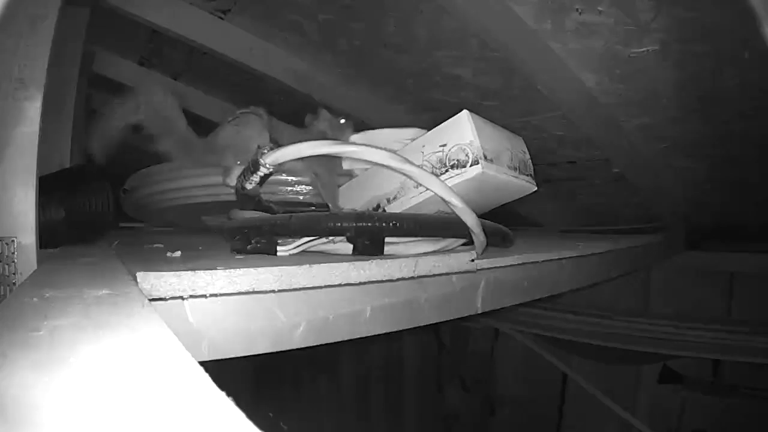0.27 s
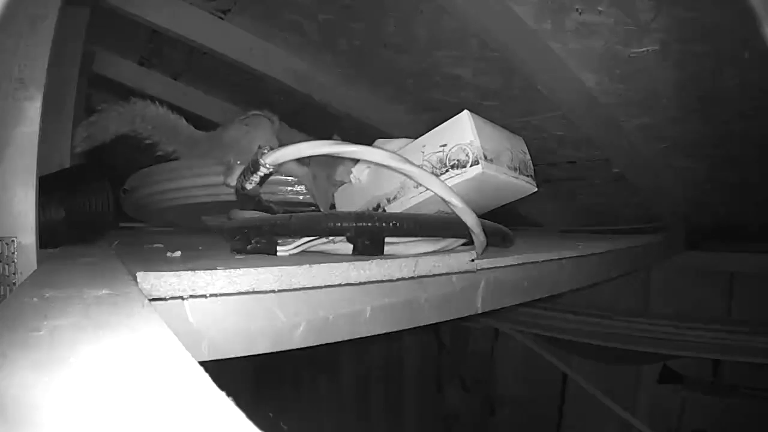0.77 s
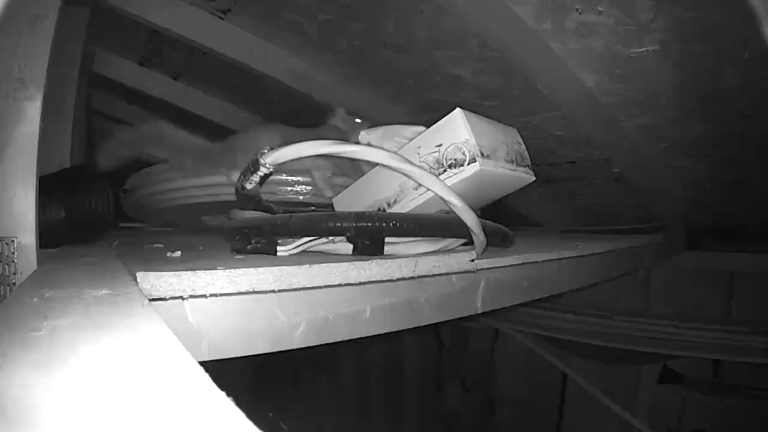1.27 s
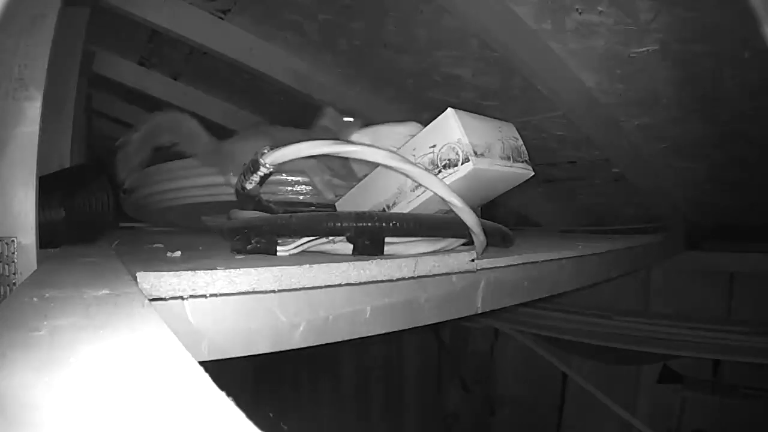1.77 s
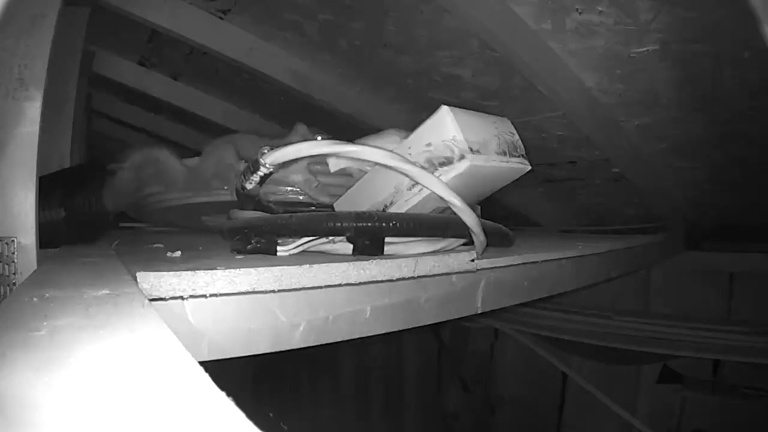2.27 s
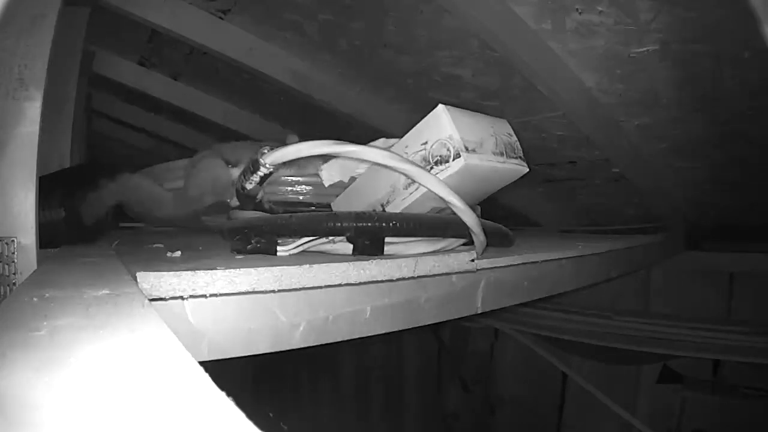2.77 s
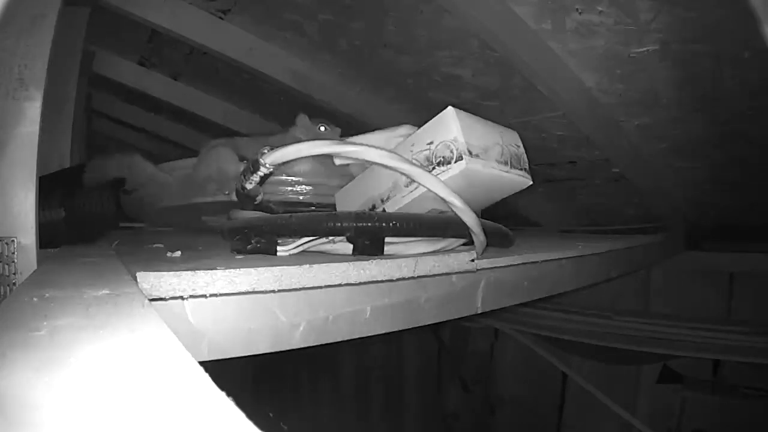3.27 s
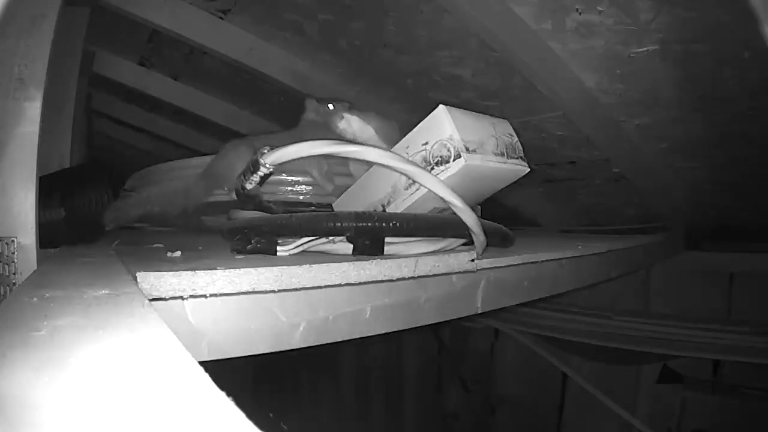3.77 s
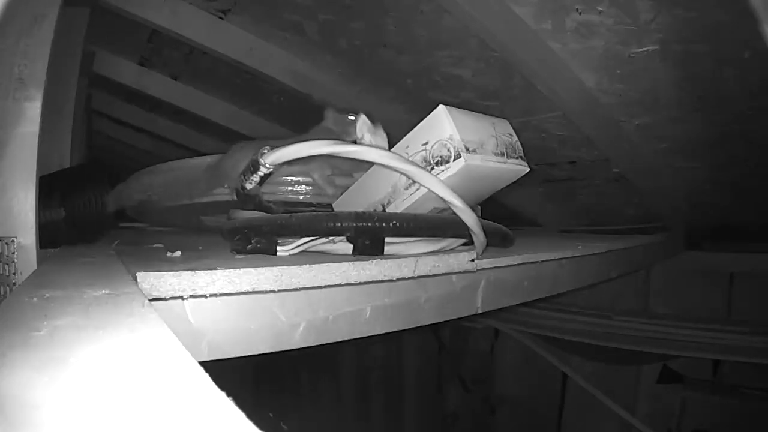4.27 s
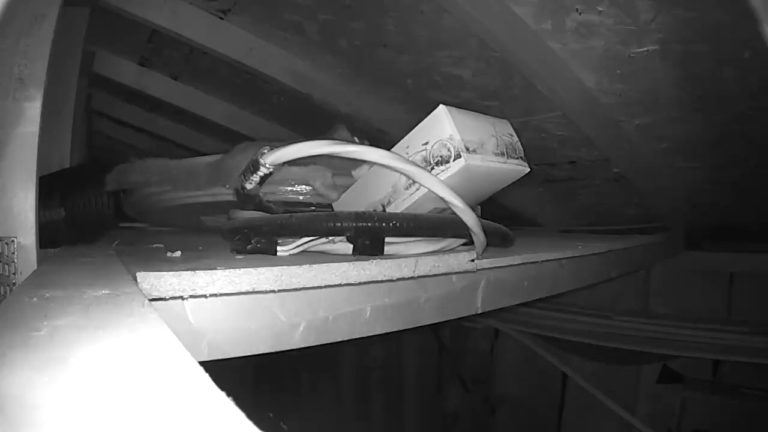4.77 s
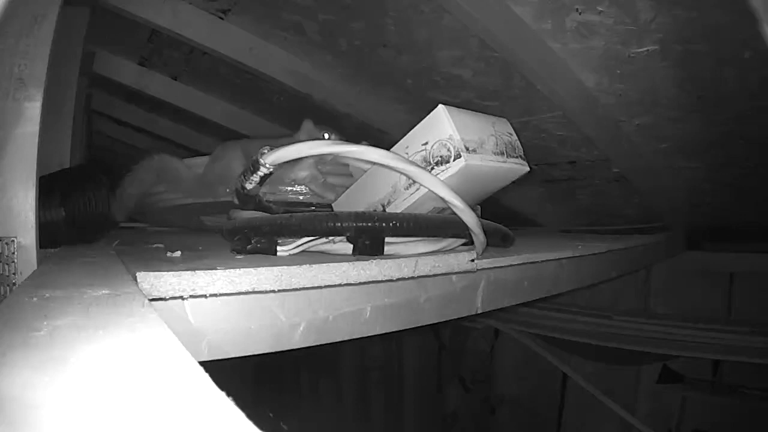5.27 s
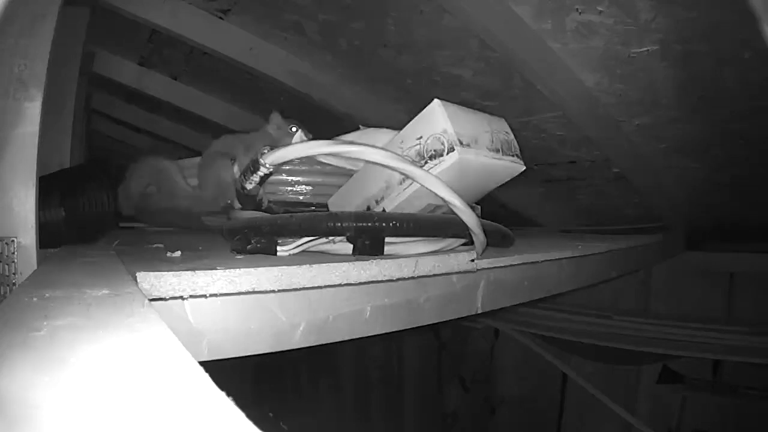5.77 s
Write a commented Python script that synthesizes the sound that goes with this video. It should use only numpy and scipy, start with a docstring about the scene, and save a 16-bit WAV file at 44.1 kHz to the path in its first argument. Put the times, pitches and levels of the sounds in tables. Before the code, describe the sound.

A squirrel works at dry nest material on a wooden attic shelf, close to a small camera microphone with slightly dulled treble. Brief papery rustles begin immediately. At about 0.1 s a sharp, bright crack strikes with a hollow plastic tock, by far the hardest click, echoing briefly under the roof. Softer tugs and dry ticks follow, with a dull box bump and paw tap near 1.4 s. From 2 to 2.8 s small paws pat the board and the shelf rocks faintly; another dull box knock comes at 3 s. A firmer step lands at 3.3 s, then the rustling becomes denser and stronger through 4.5 s. Around 5.2 to 5.4 s there is a vigorous rustle, body rubbing and solid low wooden thumps, with more thumps from 5.8 to 5.95 s. Quiet low rumble, faint hum, hiss and an almost inaudible high whine continue throughout.

```python
"""A squirrel gathers nest material on a wooden shelf in a quiet attic, close to a small camera.
Dry fibres rustle as tiny noisy grains under each tug, and snap as short bursts ringing through resonances.
Its body rubs and rocks the shelf, its paws ring the board and bumps ring a plastic box.
All of this echoes briefly in the roof space, made of fading noise; low rumble, hiss, hum and a thin
whine lie beneath, made of coloured noise and sine tones."""
import sys
import numpy as np
from scipy import signal
from scipy.fft import rfft, irfft
from scipy.io import wavfile

SR = 44100
rng = np.random.default_rng(int(sys.argv[2]) if len(sys.argv) > 2 else 0)


def file_out(sig):
    """Save sig as 16-bit WAV at sys.argv[1]."""
    # one column per channel
    cols = np.atleast_2d(sig).T
    # limit, then scale
    lim = np.clip(cols, -1, 1)
    pcm = np.round(lim * 32767).astype(np.int16)
    wavfile.write(sys.argv[1], SR, pcm)


N = 265482
TIME = np.arange(N) / SR  # seconds

# steady background, level per Hz of bandwidth before overall scaling: [f/Hz, level/dB]
BACKGROUND_SPECTRUM = [(25, 1.5), (45, 1), (75, -2.5), (110, -0.5), (160, -3), (220, -11.5), (340, -11),
                       (490, -19), (750, -21), (1200, -25), (2000, -26.5), (4000, -26.5), (6800, -27.5),
                       (7600, -37.5)]
BACKGROUND_DB = -57.5  # rms
# steady electrical tones: [f/Hz, rms level/dB]
ELECTRIC_TONES = [(102, -70), (6676, -79.5)]
# tugs at the fibres, levels before the rustle's own trim:
# [start t/s, swell t/s, hold t/s, rustle level/dB, extra low-mid level/dB (coarseness)]
FIBRE_TUGS = [(0.0, 0.02, 0.1, -58, 2), (0.112, 0.028, 0.085, -55, 2.5), (0.276, 0.046, 0.0088, -55.5, 0),
              (0.373, 0.023, 0.043, -56.5, -3), (0.463, 0.027, .03, -62, 3),
              (0.685, 0.034, 0.093, -59.5, 4), (0.935, .02, 0.097, -59, -0.5),
              (1.038, 0.028, .01, -56.5, -2), (1.34, 0.031, .01, -54.5, 4.5), (1.437, .055, 0.042, -55, 6),
              (1.607, .02, .03, -65, 3), (1.697, 0.032, .015, -57, 3.5), (1.873, .08, .01, -55.5, 4.5),
              (2.055, 0.027, .008, -57.5, 6.5), (2.108, .015, 0.053, -63.5, 6), (2.267, .04, .06, -63, 2),
              (2.366, .02, 0.041, -55.5, 2), (2.47, .03, .03, -64.5, 1), (2.648, 0.034, 0.06, -58, 5),
              (2.824, 0.043, 0.12, -63, 0.5), (3.179, .1, .02, -56.5, 3.5), (3.334, 0.033, .015, -53, 4),
              (3.41, 0.018, .01, -54.5, 3.5), (3.478, .03, 0.25, -57, 0.5), (3.726, 0.027, 0.023, -54, 1.5),
              (3.817, 0.061, .008, -50.5, 2), (3.914, 0.017, 0.03, -55.5, 6),
              (4.097, 0.034, 0.018, -53, 0.5), (4.16, 0.031, 0.074, -52.5, 3.5),
              (4.28, 0.033, 0.1, -57, 3.5), (4.409, .02, 0.084, -52, -1), (4.532, 0.022, .008, -53.5, 1),
              (4.761, .045, .03, -61, 2), (4.853, 0.031, 0.045, -55, -0.5), (4.962, .03, .01, -62, 3),
              (5.082, .03, .015, -60.5, 1), (5.172, 0.028, .005, -52, 1.5), (5.253, .025, 0.056, -50, 4.5),
              (5.357, 0.017, 0.059, -60, 3), (5.657, 0.095, .015, -53.5, 2.5),
              (5.79, 0.044, .045, -51, 1.5)]
TUG_FADE_DB_PER_S = 169.5
# rustling fibres, level per Hz of bandwidth before overall scaling: [f/Hz, level/dB]
FIBRE_SPECTRUM = [(400, -17), (620, -7), (900, -16), (1250, -6.5), (1600, -9.5), (2150, -6), (2650, -6),
                  (3100, -5.5), (3600, -1.5), (4200, -3.5), (5200, -9), (6200, -10), (7000, -12.5),
                  (7600, -31)]
# the body shifts its weight, levels before the trims for rubbing and sway:
# [start t/s, swell t/s, hold t/s, rubbing level/dB, shelf sway level/dB]
WEIGHT_SHIFTS = [(0.0, 0.0093, 0.057, -55.5, -63), (0.779, 0.036, .04, -63.5, -52.5),
                 (1.42, 0.067, 0.25, -63, -54.5), (1.957, 0.072, .15, -55, -48.5),
                 (2.43, 0.077, .05, -66, -44.5), (2.73, 0.053, 0.095, -63.5, -46),
                 (3.266, 0.03, 0.073, -53.5, -50.5), (3.5, .1, 0.41, -71.5, -53.5),
                 (4.182, 0.11, 0.22, -62.5, -49), (4.974, .04, 0.32, -63, -55),
                 (5.248, 0.052, 0.16, -49.5, -46.5), (5.745, .05, .18, -52, -42)]
SHIFT_FADE_DB_PER_S = 130
# claw ticks and snapping fibres: [t/s, level/dB, colour centre f/Hz, crumble t/s]
FIBRE_SNAPS = [(0.030, -45, 3000, .01), (0.1159, -26.5, 3000, 0.00065), (0.1177, -16.5, 3300, 0.00064),
               (0.374, -33.5, 3750, 0.0076), (0.5264, -44.5, 2920, 0.0069), (0.728, -43.5, 2500, .008),
               (0.7791, -47, 1500, 0.0053), (0.9276, -34, 3300, 0.0024), (0.958, -37.5, 2150, 0.0051),
               (0.9619, -35.5, 5830, 0.0011), (1.01, -47, 3930, 0.0023), (1.331, -42, 4400, 0.0051),
               (1.3725, -41, 3660, 0.011), (1.4227, -31.5, 5030, 0.0035), (1.4886, -35.5, 3500, .0025),
               (1.628, -37.5, 5300, 0.012), (1.705, -39, 3320, 0.011), (1.742, -45.5, 4200, 0.0036),
               (2.3758, -35.5, 4100, 0.018), (2.880, -46, 5230, 0.0077), (2.9729, -37.5, 3270, 0.027),
               (3.3617, -39.5, 3540, 0.017), (3.4257, -41, 4300, 0.0093), (3.4871, -35, 3500, 0.017),
               (3.877, -40, 3300, 0.013), (4.194, -38, 3500, 0.017), (4.417, -34, 3850, 0.012),
               (4.8649, -41, 4160, 0.0028), (5.2, -48, 3350, 0.0096), (5.25, -34.5, 5300, 0.006),
               (5.306, -34, 2770, .007), (5.801, -35.5, 4560, 0.0023)]
# resonances that colour the snaps, before each snap's own tilt: [f/Hz, width f/Hz, level/dB]
SNAP_RESONANCES = [(1210, 620, -9), (1800, 310, -2.5), (2204, 660, -4.5), (3220, 510, -2), (3470, 355, 1),
                   (4110, 440, -3), (4810, 460, -5.5), (5550, 1300, -10.5), (6560, 1000, -11)]
# bumps on the plastic box; a hard claw is bright, a soft flank dull: [t/s, level/dB, upper edge f/Hz]
BOX_BUMPS = [(0.1166, -29, 1800), (0.1182, -26, 5000), (1.430, -39.5, 900), (2.9718, -37, 840)]
# ring of the hollow box: [f/Hz, width f/Hz, level/dB]
BOX_RING = [(708, 140, -14), (1019, 36, -2.5), (1214, 58, 0.5), (1430, 84, 0.5), (1548, 33, -2),
            (1834, 37, -3.5), (2130, 120, -4.5), (2490, 260, -11), (2880, 110, -10), (2985, 88, 5.5),
            (3030, 87, -1), (3380, 65, -4.5), (3530, 49, 2.5), (3620, 59, 0), (3780, 58, -1.5),
            (4060, 89, 1), (4700, 150, -13)]
# paws landing on the board: [t/s, pad level/dB, claw level/dB and heel level/dB, both against the pad]
PAW_STEPS = [(0.117, -44.5, -2, -23), (0.779, -60.5, 10.5, -14), (1.434, -51.5, 0, 0.5),
             (1.994, -49.5, -18, -10), (2.021, -44, -8, 5.5), (2.085, -64, 3, 2), (2.178, -47.5, -7, 1),
             (2.374, -52.5, -6, -2), (2.513, -55, -11, 2), (2.672, -49, -10, 3.5), (2.7557, -47, -1.5, 3.5),
             (3.283, -39.5, -5.5, 1.5), (3.489, -51.5, 5.5, -8), (4.307, -46.5, -6.5, -1.5),
             (4.994, -49.5, -4, -17), (5.097, -56, -9, 3), (5.303, -36, -2.5, -2.5),
             (5.372, -29.5, -12, -17), (5.379, -32, -26, -7), (5.779, -39.5, -23, 1.5),
             (5.871, -45, -1.5, 1.5), (5.9315, -31.5, -7.5, -6.5), (5.949, -37.5, -17, -8)]
# ring of the board, before changes of spot or damping: [f/Hz, width f/Hz, level/dB]
BOARD_RING = [(94, 13, -3.5), (152, 64, -5.5), (235, 140, -12.5), (267, 39, -3.5), (366, 60, -2),
              (424, 68, 0), (482.5, 38, 5), (628, 85, -6.5), (773, 120, -9), (920, 350, -16.5)]
# the attic's decay, time to fall by 60 dB: [f/Hz, t/s]
ATTIC_DECAY = [(100, 0.68), (500, 0.4), (1500, 0.55), (4000, 0.24), (7000, .35)]
CAMERA_CUTOFF_HZ = 7300


def from_db(db):
    """Turn decibels into a gain."""
    return 10 ** (np.asarray(db) / 20)


def rms_one(x):
    """Scale a sound to an rms (average strength) of 1."""
    return x / np.sqrt(np.mean(x ** 2) + 1e-20)


def at_hz(points, hz):
    """Read a table between its points, on a log-frequency axis."""
    freqs, values = np.transpose(points)
    return np.interp(np.log(hz + 1e-3), np.log(freqs), values)


def band(x, low_hz, high_hz, order=2):
    """Keep only the frequencies between two edges."""
    edges = [low_hz, min(high_hz, SR / 2 - 1)]
    return signal.sosfilt(signal.butter(order, edges, "band", fs=SR, output="sos"), x)


def coloured(x, spectrum):
    """Give a steady sound a spectrum that falls away below its first point; rms 1."""
    hz = np.arange(N // 2 + 1) * SR / N
    skirt = np.minimum(hz / spectrum[0][0], 1) ** 2
    shape = from_db(at_hz(spectrum, hz)) * skirt
    return rms_one(irfft(rfft(x) * shape, N))


def drift(per_s):
    """Wander at random, with straight lines between so many chance points a second."""
    knots = rng.standard_normal(8192)
    return np.interp(TIME * per_s, np.arange(len(knots)), knots)


def resonate(x, modes):
    """Ring a set of resonances side by side, with alternating signs; wide ones die sooner."""
    out = 0
    for k, (hz, width_hz, db) in enumerate(modes):
        radius = np.exp(-np.pi * width_hz / SR)
        poles = [1, -2 * radius * np.cos(2 * np.pi * hz / SR), radius ** 2]
        # the tiny offset keeps the filter away from extremely small numbers
        ringing = signal.lfilter([1, 0, -1], poles, x + 1e-18)
        out = out + (-1) ** k * from_db(db) * (1 - radius ** 2) / 2 * ringing
    return out


def contact(crumble_s, grit):
    """One sharp touch, with a dying burst of tiny slips; grit sets the strength of the burst."""
    t = TIME[:SR // 5]
    slips = rng.standard_normal(len(t)) * np.exp(-t / max(crumble_s, 1e-4))
    return (t == 0) + grit * slips / np.linalg.norm(slips)


def at_level(x, db, length_s):
    """Give a blow the energy of a steady sound of that rms level and length."""
    return from_db(db) * x / np.linalg.norm(x) * np.sqrt(length_s * SR)


def add(track, s, x):
    """Mix a sound into a track at a time in seconds."""
    start = max(int(s * SR), 0)
    track[start:start + len(x)] += x[:N - start]


def strokes(rows, fade_db_per_s):
    """Gain of a run of movements (start s, swell s, hold s, dB): each builds, holds, then dies away."""
    t, power = TIME[:SR], np.zeros(N)
    for s, swell_s, hold_s, db in rows:
        swell = np.minimum(t / max(swell_s, 1e-3), 1)
        fade_db = fade_db_per_s * np.maximum(t - swell_s - hold_s, 0)
        # powers add where movements overlap
        add(power, s, (swell * from_db(db - fade_db)) ** 2)
    return np.sqrt(power)


def background():
    """House rumble and microphone hiss are coloured noise; a faint hum and a thin whine are sines."""
    tones = np.zeros(N)
    for hz, db in ELECTRIC_TONES:
        phase = 2 * np.pi * hz * TIME + 1.2 * drift(3.4)  # slightly unsteady pitch
        tones += from_db(db) * np.sqrt(2) * np.sin(phase)
    noise = coloured(rng.standard_normal(N), BACKGROUND_SPECTRUM)
    return from_db(BACKGROUND_DB) * noise + tones


def rustle(grains_per_s=2400, size_db=2.0, clump_db=1.74, rub=0.65, rustle_db=-0.7):
    """With each tug fibres catch and slip in clumps of tiny grains, over the smooth hiss of rubbing."""
    sizes = from_db(size_db * np.minimum(rng.exponential(1, N), 3.5))
    signed_sizes = sizes * rng.choice([-1, 1], N)
    grains = rms_one(signed_sizes * (rng.random(N) < grains_per_s / SR))
    fibres = coloured(grains + rub * rng.standard_normal(N), FIBRE_SPECTRUM)

    # coarse tugs bring out the low mids
    low_mids = band(fibres, 500, 2200, order=1)
    fine_rows = [(*timing, db) for *timing, db, _ in FIBRE_TUGS]
    coarse_rows = [(*timing, db + coarse_db) for *timing, db, coarse_db in FIBRE_TUGS]
    fine = strokes(fine_rows, TUG_FADE_DB_PER_S)
    coarse = strokes(coarse_rows, TUG_FADE_DB_PER_S)
    clumps = from_db(rustle_db + clump_db * drift(130))
    return (fine * (fibres - low_mids) + coarse * low_mids) * clumps


def shuffle(shuffle_db=-5.0, sway_db=-6.5, uneven_db=2.0, damping=2.2):
    """Belly and feet rub softly on the board and damp its ring; the whole shelf rocks slowly."""
    damped_ring = [(hz, width_hz * damping, db) for hz, width_hz, db in BOARD_RING]
    rubbing = rms_one(band(resonate(rng.standard_normal(N), damped_ring), 78, 420, order=1))
    rocking = rms_one(band(rng.standard_normal(N), 17, 30, order=3))
    rub_rows = [(*timing, db) for *timing, db, _ in WEIGHT_SHIFTS]
    sway_rows = [(*timing, db) for *timing, _, db in WEIGHT_SHIFTS]
    rub = strokes(rub_rows, SHIFT_FADE_DB_PER_S)
    sway = strokes(sway_rows, SHIFT_FADE_DB_PER_S)
    unevenness = from_db(shuffle_db + uneven_db * drift(46))
    return rubbing * rub * unevenness + rocking * sway * from_db(sway_db)


def snaps(colour_octaves=1.45, hard_db=-26):
    """Small fibres crumble in a burst of slips; a hard crack breaks mostly all at once."""
    out = np.zeros(N)
    for s, db, centre_hz, crumble_s in FIBRE_SNAPS:
        modes = []
        for hz, width_hz, mode_db in SNAP_RESONANCES:
            # resonances far from the colour centre are weaker
            distance = np.log2(hz / centre_hz) / colour_octaves
            modes.append((hz, width_hz, mode_db - 6 * distance ** 2))
        if db > hard_db:
            crack = band(resonate(contact(crumble_s, grit=0.64), modes), 810, 5000)
        else:
            crack = resonate(contact(crumble_s, grit=5.5), modes)
        add(out, s, at_level(crack, db, length_s=0.00084))
    return out


def bumps():
    """The hollow box answers a soft bump with a low tock and a hard claw with far more of its ring."""
    out = np.zeros(N)
    for s, db, bright_hz in BOX_BUMPS:
        push = band(contact(0.0026, grit=0.34), 300, bright_hz)
        add(out, s, at_level(resonate(push, BOX_RING), db, length_s=0.0018))
    return out


def steps(place_db=3.0):
    """A soft pad rings the board, the heel thumps low and the claws scratch higher up."""
    out = np.zeros(N)
    for s, db, claw_db, heel_db in PAW_STEPS:
        # each spot on the board favours other modes
        modes = [(hz, width_hz, mode_db + place_db * rng.standard_normal())
                 for hz, width_hz, mode_db in BOARD_RING]
        pad = resonate(contact(0.0088, grit=0.84), modes)
        claws = band(contact(0.012, grit=9), 800, 3300)
        heel = band(contact(0.016, grit=0.8), 85, 220)
        paw = at_level(pad, db, length_s=0.0041)
        paw = paw + at_level(claws, db + claw_db, length_s=0.0059)
        paw = paw + at_level(heel, db + heel_db, length_s=0.0032)
        add(out, s, paw)
    return out


def attic(x, wet_db=-6.0, early_db=-7.0, early_s=0.0065):
    """Quick reflections off the nearby roof boards, then a diffuse tail that dies by band."""
    t = TIME[:SR * 3 // 4]
    edges = np.geomspace(60, 9000, 9)  # Hz, borders of eight bands
    white = rng.standard_normal((3, len(t)))
    tail = np.zeros(len(t))
    for k, (low_hz, high_hz) in enumerate(zip(edges, edges[1:])):
        decay_s = at_hz(ATTIC_DECAY, np.sqrt(low_hz * high_hz))
        # neighbouring bands use different noise
        tail += band(white[k % 2], low_hz, high_hz) * from_db(-60 * t / decay_s)
    tail *= t > 0.006
    early = band(white[2], 33, 9900) * np.exp(-t / early_s) * (t > 0.003)
    late_part = from_db(wet_db) * tail / np.linalg.norm(tail)
    early_part = from_db(early_db) * early / np.linalg.norm(early)
    # the noise fills only part of the full frequency range
    in_band = np.sqrt(2 * edges[-1] / SR)
    return x + signal.fftconvolve(x, in_band * (late_part + early_part))[:N]


def scene():
    """All the animal's sounds pass through the roof space; sharp blows stir it most."""
    cracks = attic(snaps() + bumps(), wet_db=-9.0, early_db=-7.5)
    thuds = attic(steps(), wet_db=-9.0, early_db=-11.0)
    rubbing = attic(rustle() + shuffle(), wet_db=-23.0, early_db=-11.0)
    return (cracks + thuds + rubbing + background())[None]


def record(dry):
    """The camera keeps only the band below its cut-off, with a steep low-pass filter."""
    low_pass = signal.ellip(8, 0.3, 65, CAMERA_CUTOFF_HZ, fs=SR, output="sos")  # ripple, rejection in dB
    return signal.sosfilt(low_pass, dry)


dry = scene()
out = record(dry)
file_out(out)
```